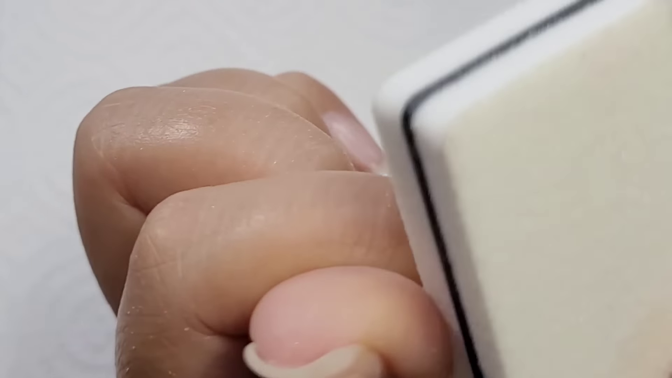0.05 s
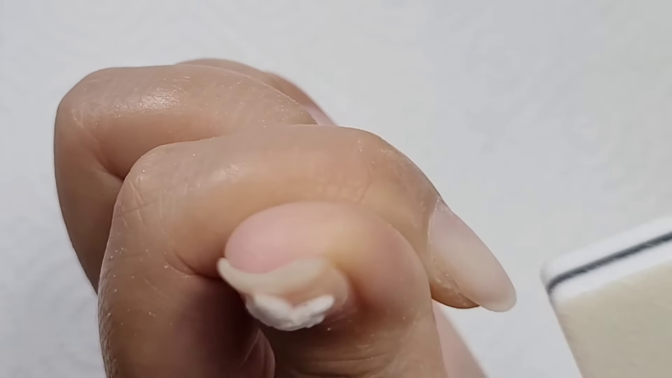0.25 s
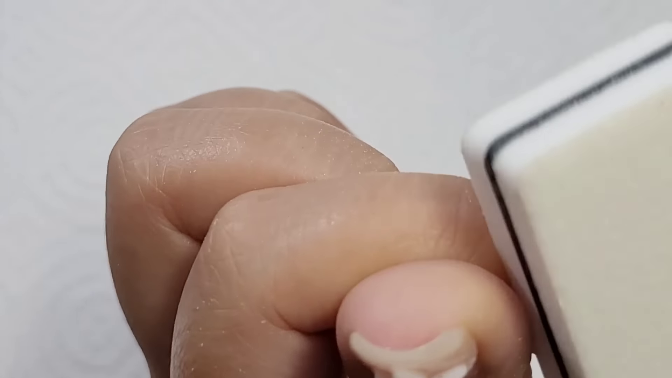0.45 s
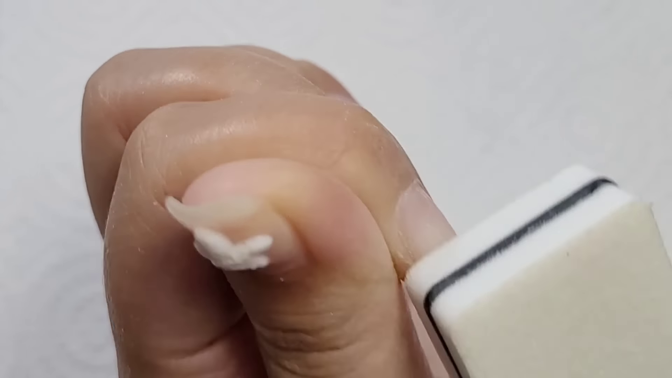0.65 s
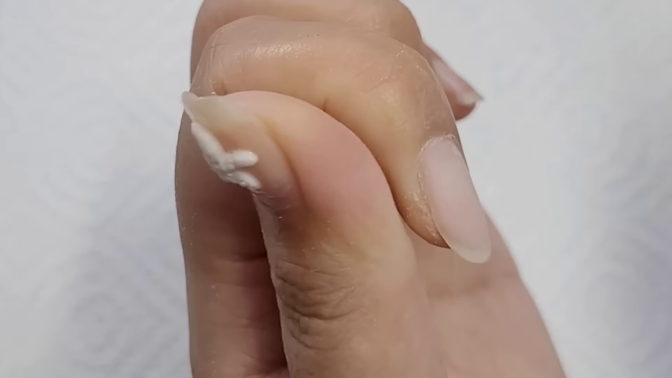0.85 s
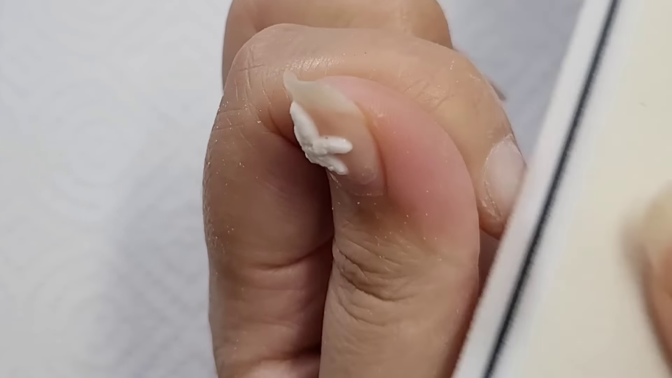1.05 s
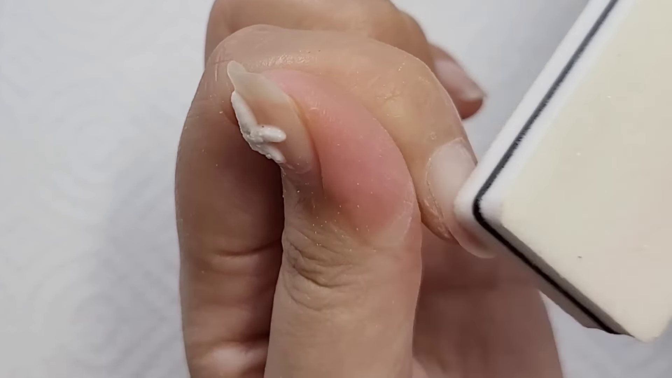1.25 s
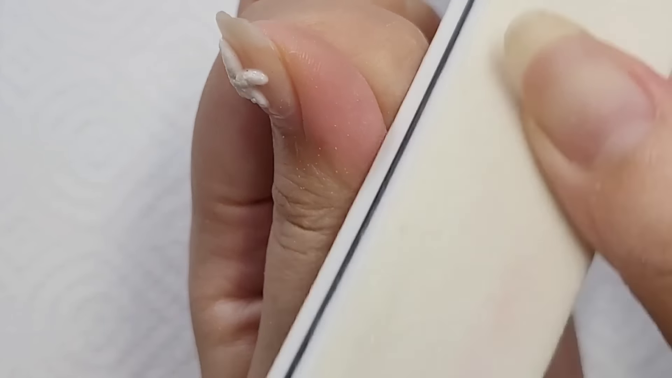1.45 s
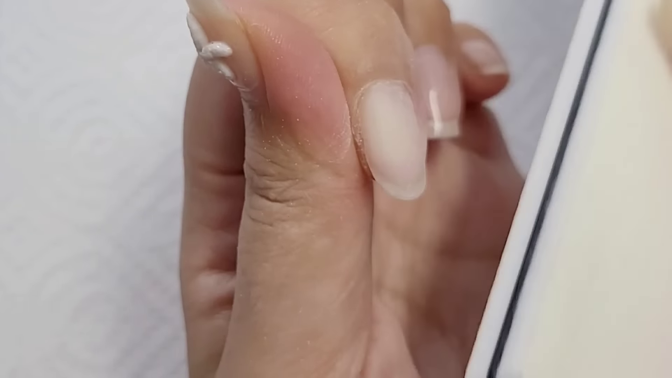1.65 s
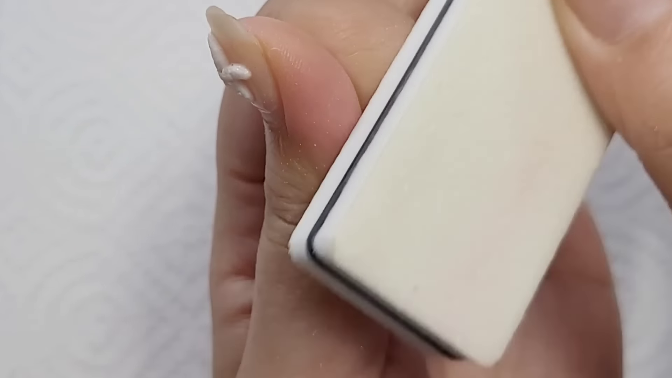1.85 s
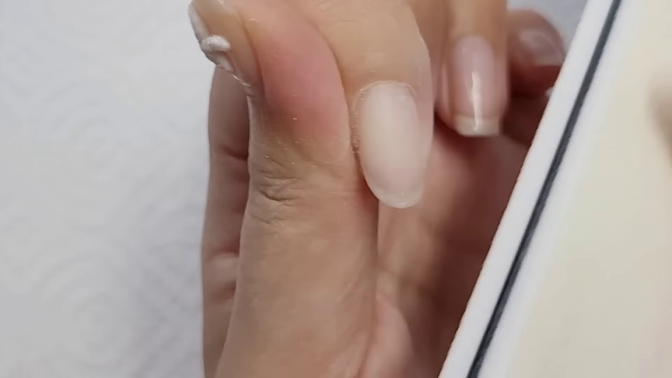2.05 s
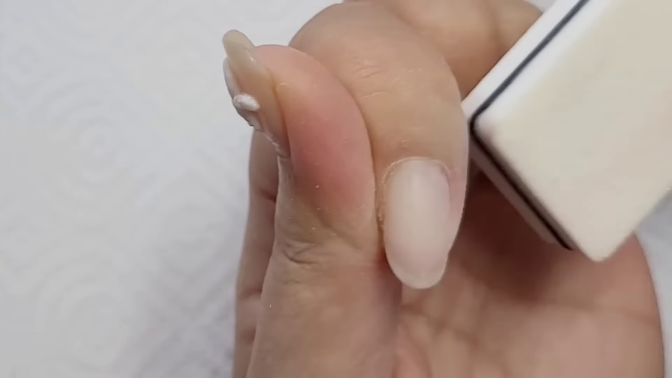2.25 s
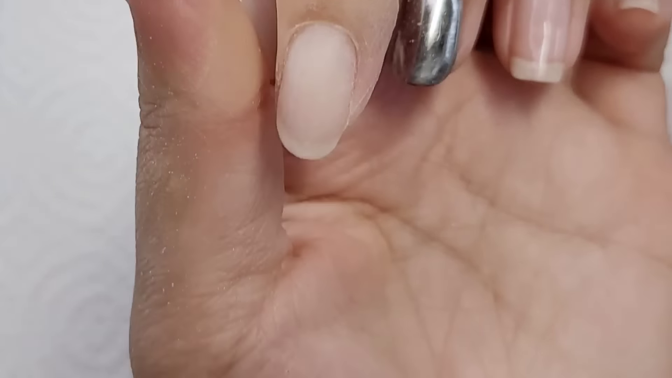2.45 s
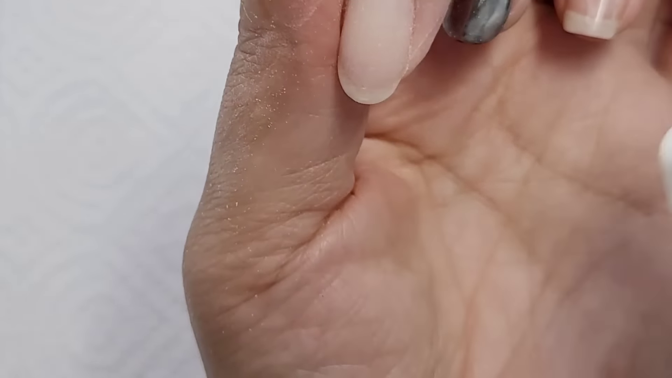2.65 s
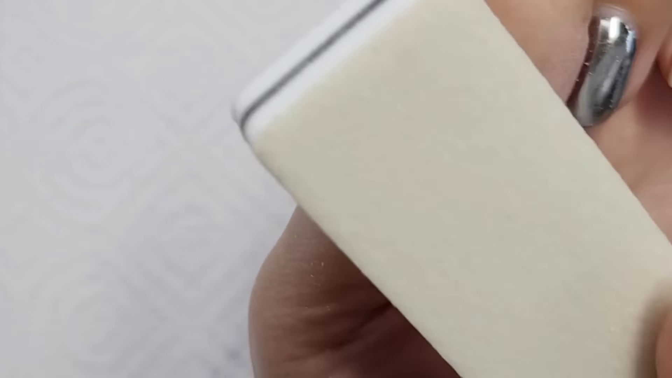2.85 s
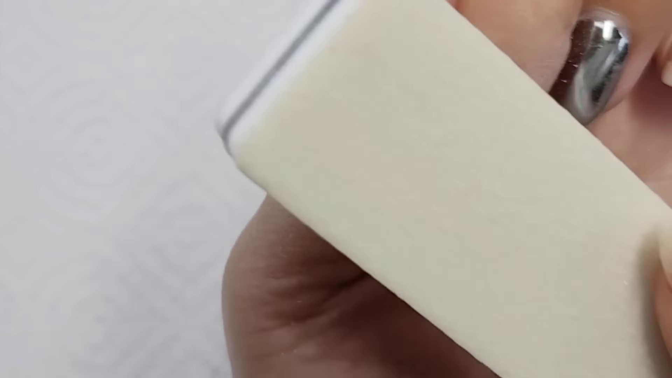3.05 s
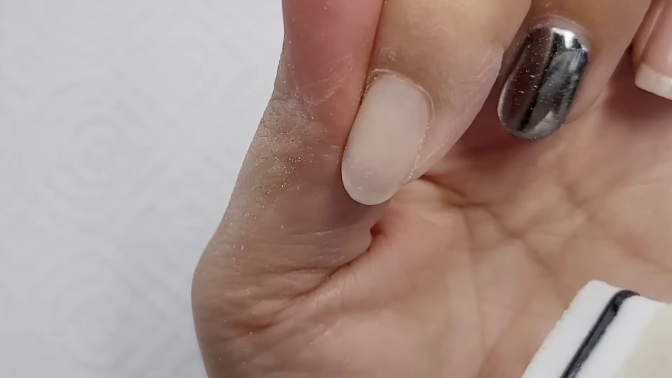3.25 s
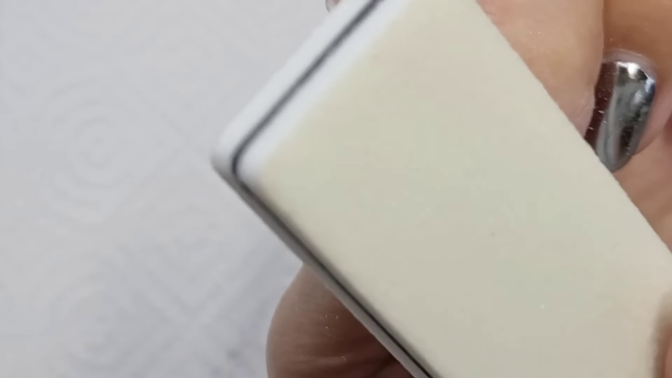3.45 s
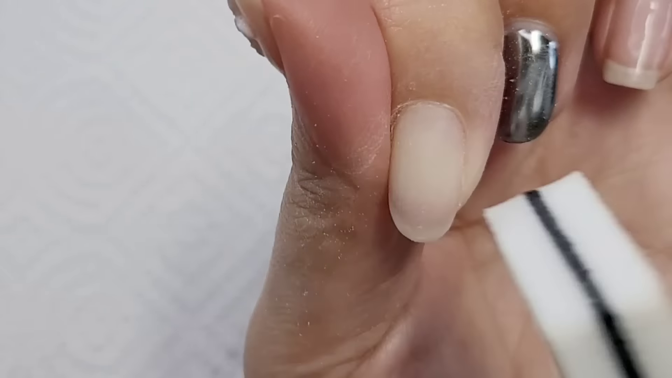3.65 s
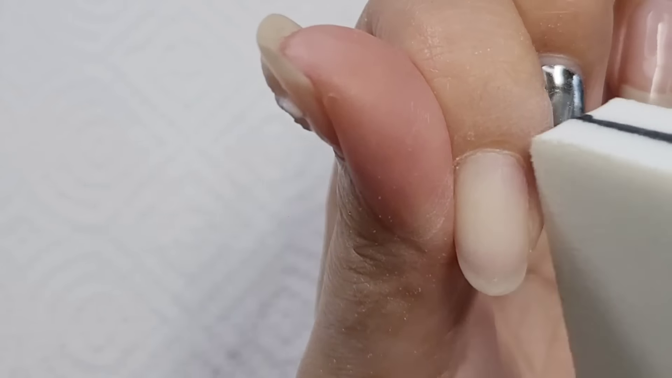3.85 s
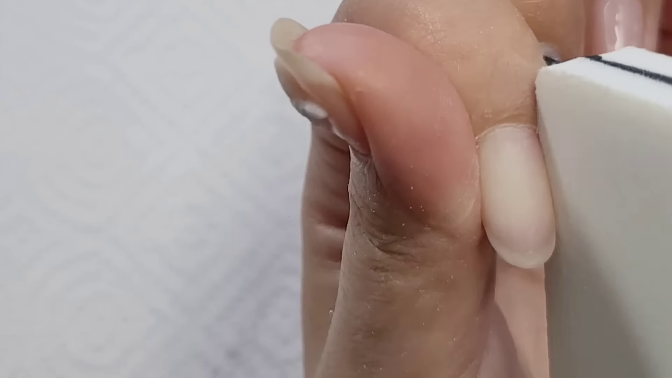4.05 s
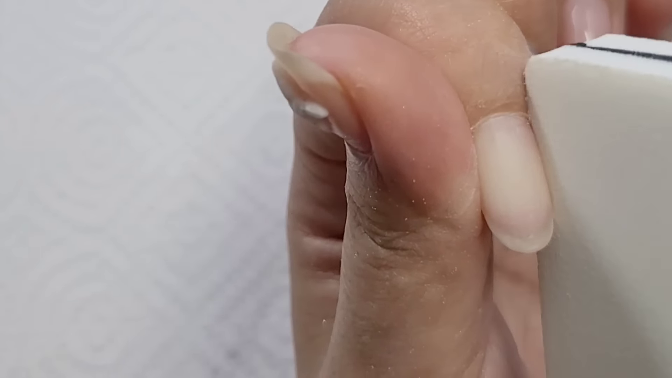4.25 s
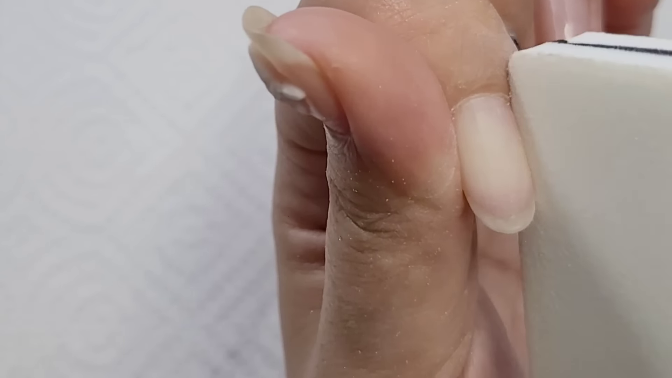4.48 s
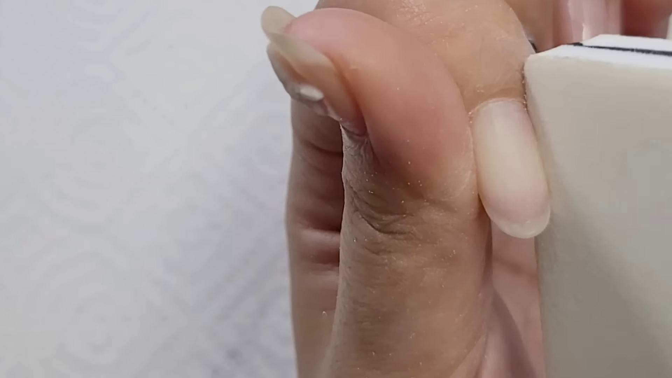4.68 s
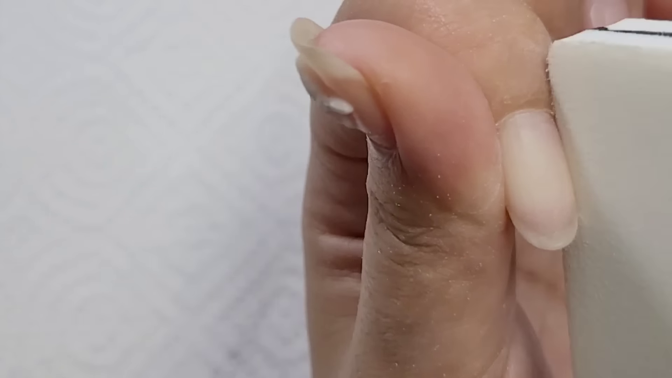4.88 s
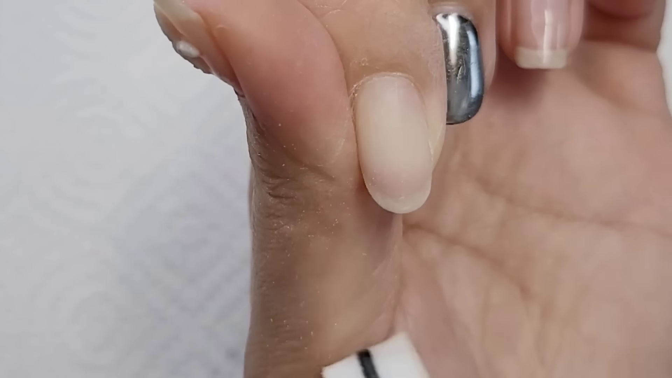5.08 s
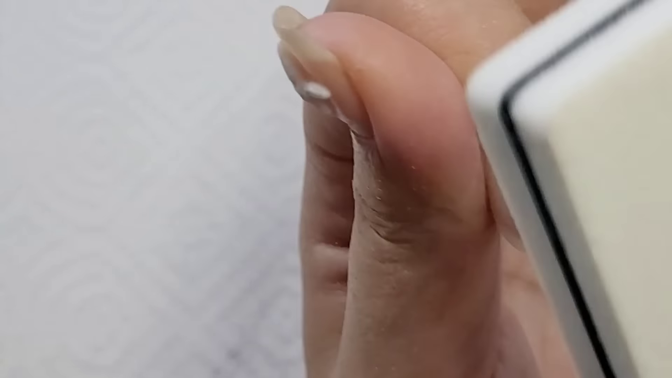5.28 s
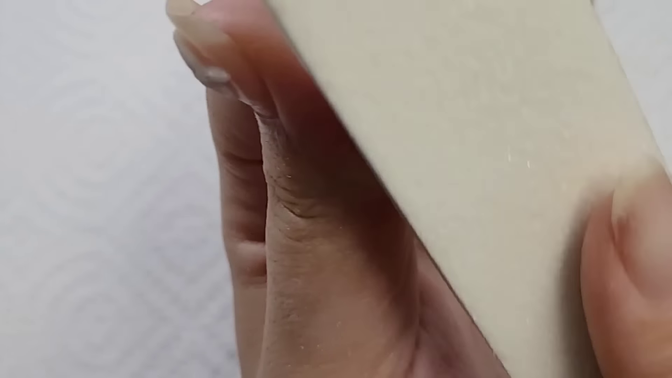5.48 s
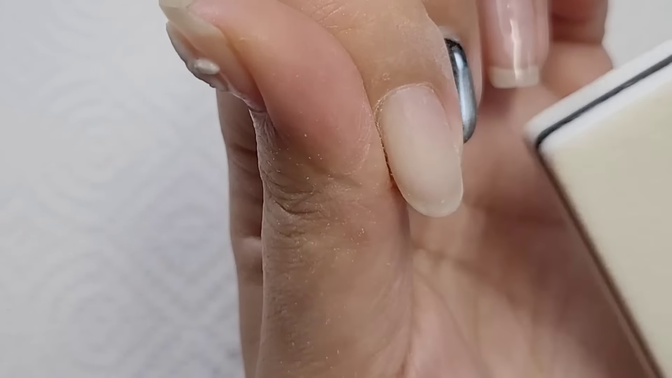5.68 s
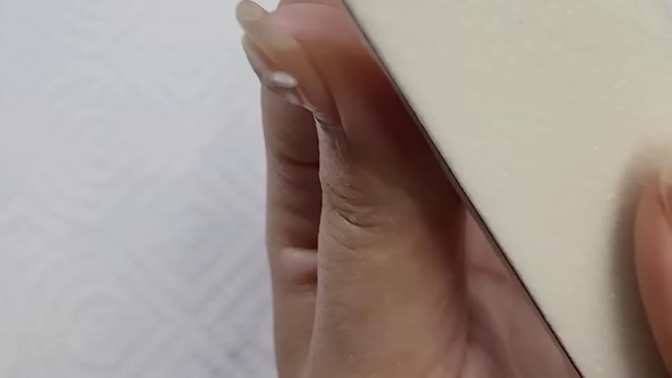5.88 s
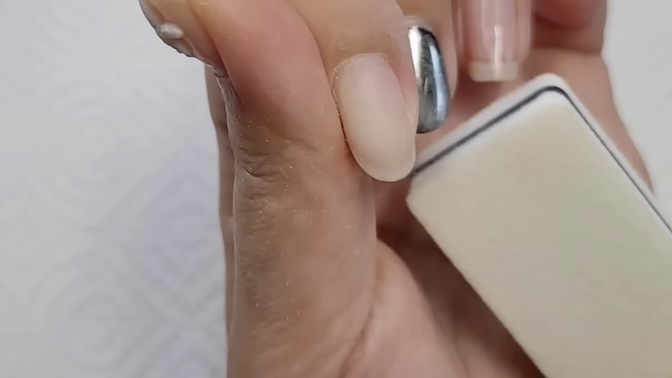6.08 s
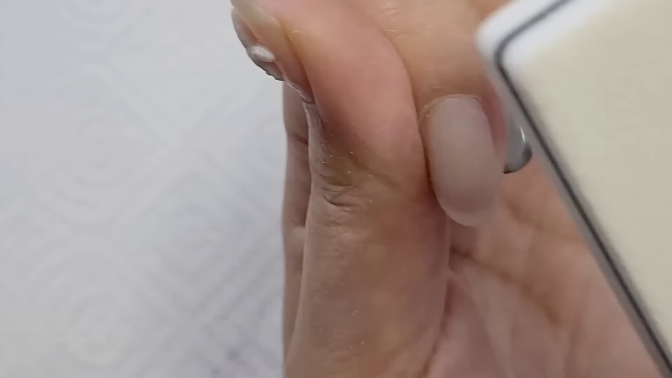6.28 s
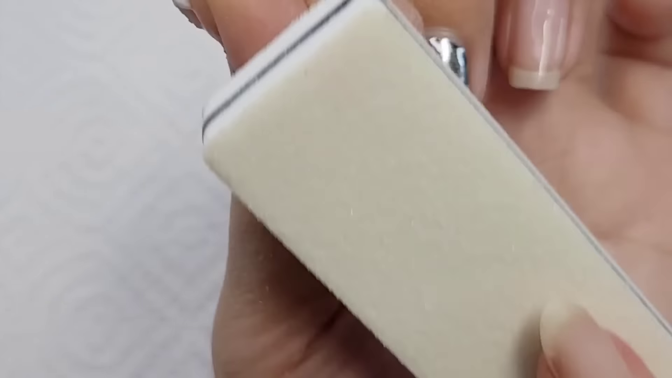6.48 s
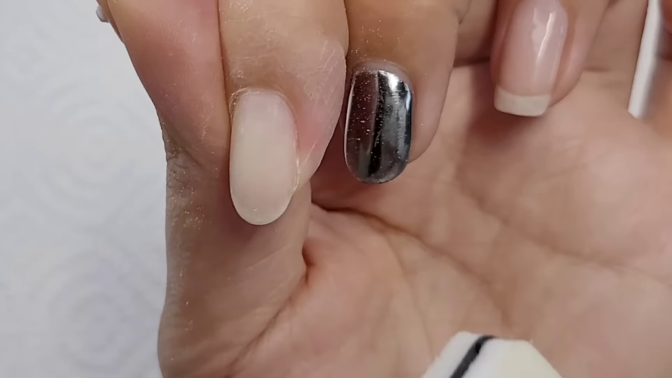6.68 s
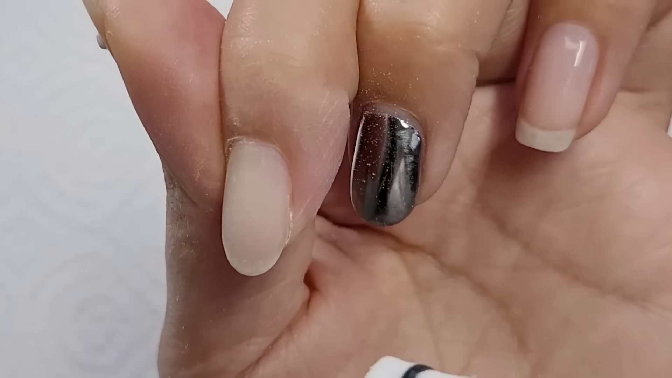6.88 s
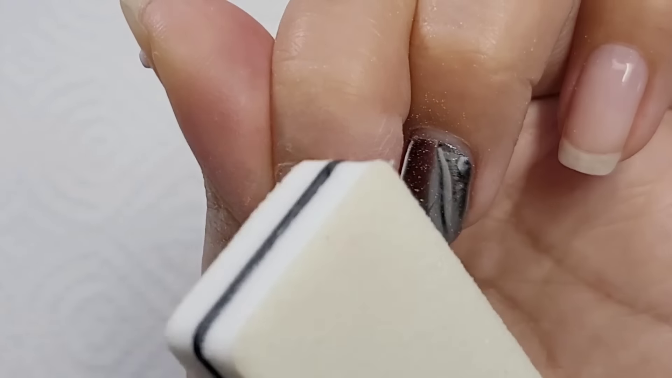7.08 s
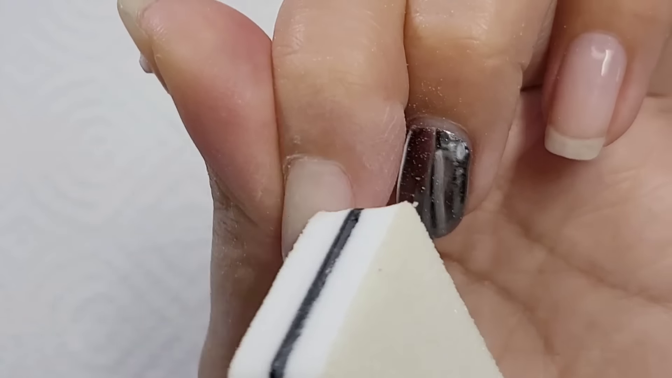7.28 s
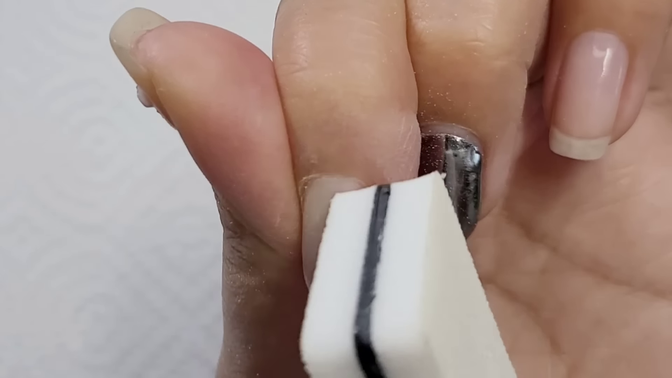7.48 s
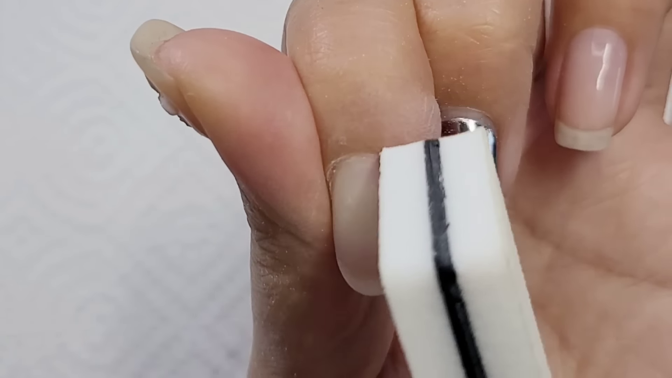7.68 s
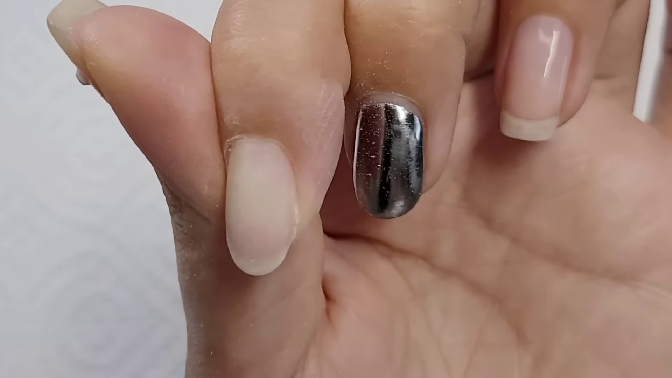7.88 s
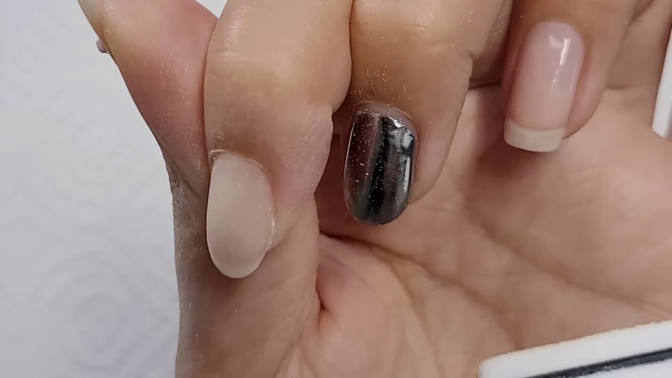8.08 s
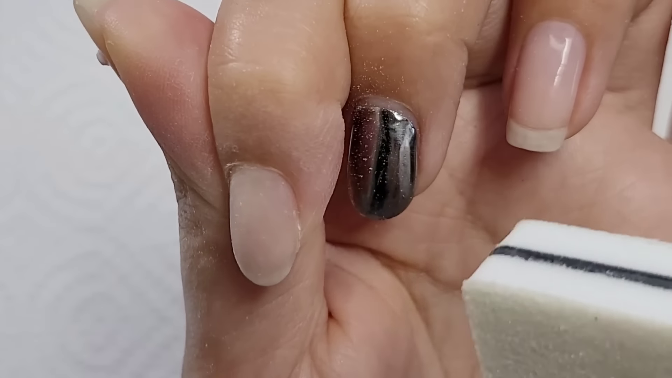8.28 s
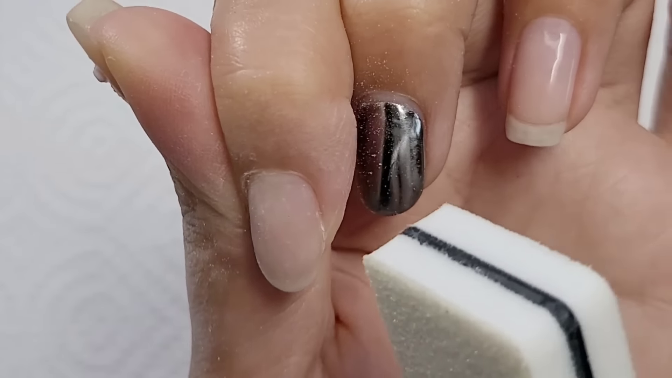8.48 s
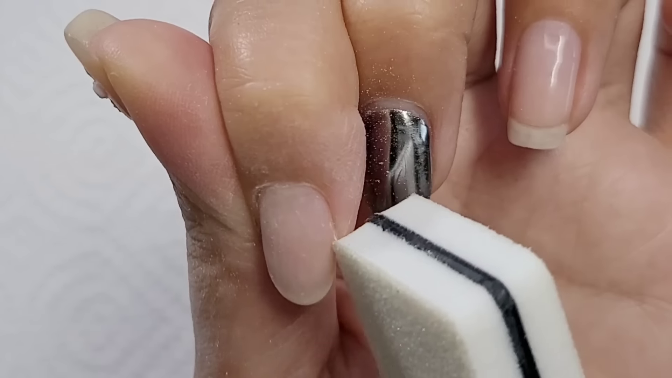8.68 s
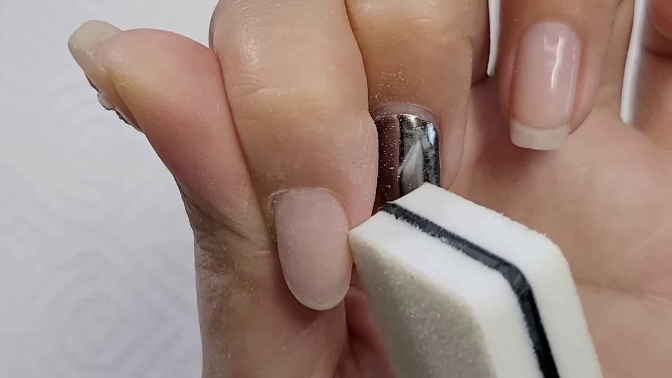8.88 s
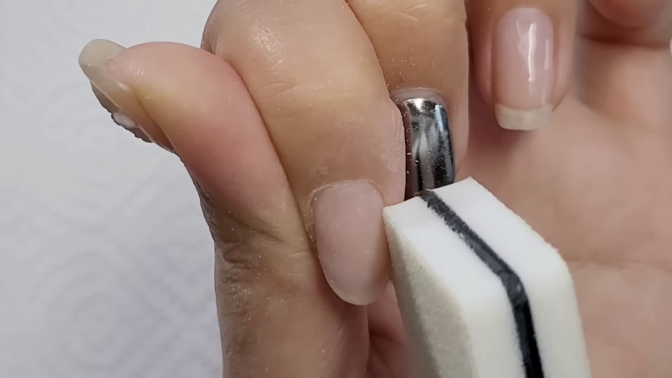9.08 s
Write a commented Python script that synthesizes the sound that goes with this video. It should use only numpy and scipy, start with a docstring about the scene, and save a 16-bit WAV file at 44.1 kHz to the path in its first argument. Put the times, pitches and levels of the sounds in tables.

```python
"""Small quiet room, a phone's stereo microphones close to a fingernail being rubbed with a padded block.
The block lands with a scuff; grit catches and hisses in single strokes, and some hard ones end in a
snap off the nail's edge and a soft finger thud. At 4.2 s comes a quick, even run, then four hard strokes
with snaps, a second run at 7.4 s and a last snap. By 8.6 s the hands rest, leaving low room tone.
Hand and table reflect the sound to the microphones differently on every stroke."""
import sys
import numpy as np
from scipy import signal
from scipy.fft import rfft, irfft, next_fast_len
from scipy.io import wavfile
from scipy.ndimage import map_coordinates

SR = 44100
rng = np.random.default_rng(int(sys.argv[2]) if len(sys.argv) > 2 else 0)


def transcribe(signal):
    """Save signal, clipped to [-1, 1], as a 16-bit WAV file at the path in sys.argv[1]."""
    frames = np.atleast_2d(signal).T
    limited = np.clip(frames, -1, 1)
    pcm = np.round(limited * 32767).astype(np.int16)
    wavfile.write(sys.argv[1], SR, pcm)


N = 402633
TIME = np.arange(N) / SR

# single strokes: t/s, length/s, level/dB, speeding up/s, pressure change along it/dB, body/dB, rasp/dB
SINGLE_STROKES = [(0.0, 0.15, -58, 0.066, -5, 8.5, 10.5), (0.143, 0.21, -39, 0.067, 11.5, -2, 3),
                  (0.527, 0.13, -44, 0.017, -5.5, -0.5, 4), (0.673, 0.17, -39.5, .029, 11.5, -3.5, -0.5),
                  (1.22, 0.21, -39.5, 0.11, -6, -2.5, -2.5), (1.52, 0.22, -43.5, 0.048, 9, -2.5, -2),
                  (1.894, 0.23, -42.5, 0.064, 6.5, 1, 0.5), (2.254, 0.17, -41, .008, 8, 0, 0),
                  (2.685, 0.093, -47, .01, 14, 4, 3), (2.817, 0.07, -60.5, 0.024, -9, 0, -3),
                  (2.917, 0.075, -60.5, .025, 1, 5, 0), (2.959, 0.16, -43.5, 0.0079, -1.5, 0, 1.5),
                  (3.137, 0.16, -39.5, 0.051, 0.5, 2.5, 1.5), (3.291, 0.046, -40.5, 0.027, 2, -4, -2),
                  (3.424, 0.085, -63, 0.037, 7, 1, 7), (3.489, 0.12, -45.5, 0.01, -1.5, -5, 0),
                  (3.654, 0.18, -43.5, 0.097, -19, -3.5, 0), (4.129, 0.075, -67.5, 0.022, 0, 3, 0),
                  (5.073, 0.11, -42, 0.047, 13, 2.5, 2.5), (5.56, 0.25, -39.5, 0.097, -1, 0.5, 0.5),
                  (6.058, 0.194, -38.5, 0.018, 13.5, 0.5, 0.5), (6.543, 0.192, -39, 0.026, 11.5, 1, 0.5),
                  (7.17, 0.11, -52.5, 0.014, 7.5, -3, 3), (7.824, 0.095, -42, .042, 25, 3, 2),
                  (8.502, 0.18, -69, 0.012, 6, 9, 8)]
# quick to-and-fro runs: from t/s, until t/s, beat/s, first, middle and last level/dB, body/dB, rasp/dB
QUICK_RUNS = [(4.239, 5.02, 0.10395, -52, -54, -47, 6.3, 1.5),
              (7.357, 7.78, 0.1176, -45.5, -47, -58, 1.3, 2.8)]
# slips off the nail's edge: t/s, snap/dB, nail knock/dB, finger thud/dB, thud f/Hz, snap decay/s, run-on/dB
EDGE_SLIPS = [(0.334, -30.5, -44, -44.5, 120, .0017, -64.5), (.8239, -28.5, -42.5, -42.5, 117, 0.0033, -66),
              (2.421, -32.5, -33.5, -36, 209, .0018, -53), (2.757, -42.5, -62, -75, 115, 0.0033, -70),
              (5.163, -25.5, -57, -46, 135, 0.0024, -56), (5.777, -36, -43.5, -49, 115, .0036, -69),
              (6.2227, -26.5, -42, -48.5, 115, .0014, -45), (6.709, -27, -38.5, -45, 124, 0.0026, -48),
              (7.9, -31, -56, -44, 132, 0.0039, -52)]
# the block meets the nail: t/s, scuff level/dB, finger thud level/dB
BLOCK_LANDINGS = [(.094, -46, -72), (.94, -47, -75), (1.207, -39.5, -60), (1.514, -41.5, -58),
                  (2.26, -42.5, -49), (2.961, -50, -55), (3.493, -56, -64), (4.027, -58, -74),
                  (5.247, -49.5, -69), (5.522, -51.5, -50.5), (6.035, -58.5, -42.5), (6.491, -45, -53.5),
                  (7.99, -41, -73), (8.447, -55.5, -80)]
# light drags between strokes, one contour each: t/s, level/dB
DRAG_CONTOURS = [
    [(0.86, -66), (0.888, -65), (0.934, -62), (0.954, -51.5), (0.978, -55.5), (1.006, -46.5), (1.056, -53),
     (1.072, -58.5), (1.2, -57)],
    [(2.45, -49), (2.468, -63), (2.478, -72), (2.504, -51), (2.57, -65), (2.598, -55.5), (2.666, -63.5),
     (2.674, -57), (2.68, -64)],
    [(8.03, -52), (8.076, -68), (8.116, -51), (8.274, -62.5), (8.338, -52), (8.378, -80), (8.406, -55.5),
     (8.46, -62.5), (8.49, -88)],
]
# spectrum of grit on nail: f/Hz, level/dB
GRIT_SPECTRUM = [(300, 8), (800, 13), (1400, -4.5), (2000, -6.5), (2700, -10), (3600, -7), (5000, -3.5),
                 (6300, 0.5), (8300, -3), (10500, -3.5), (13000, 0), (16000, -3)]
# spectrum of the snap off the edge: f/Hz, level/dB
SNAP_SPECTRUM = [(300, -20.5), (1200, -11.5), (2600, -2.5), (4500, -3), (7500, -1.5), (10000, -9.5),
                 (16000, -5)]
# modes of the nail, damped by the finger: f/Hz, level/dB, t60/s
NAIL_RINGS = [(420, -1, .009), (760, 0, .010), (1080, -3, .009), (1600, -9, .007)]
# hollow between block and fingers, set by the grip, open to one side: t/s, f/Hz, Q, left minus right/dB
GRIP_HOLLOW = [(.15, 2640, 3, 0), (.53, 2540, 5, 0), (.7, 2640, 1.6, 0), (2.2, 2870, 1.53, 0),
               (2.95, 2660, 3.2, 1), (4.3, 2550, 5.4, -0.5), (5, 2600, 2.5, -0.5), (5.6, 2710, 3.5, -0.5),
               (6.6, 2700, 2.9, 1), (7.2, 2620, 9.6, 2.5), (7.8, 2470, 3.5, 2.5), (8.1, 2730, 2.2, 0.5)]
# resonance of the left and the right microphone port: f/Hz, width/Hz, level/dB
MIC_PORTS = [(8970, 1760, 6.5), (8100, 1500, 4.5)]
# response of the right microphone, facing away from the hand: f/Hz, level/dB
OFF_AXIS_RESPONSE = [(200, 4), (1000, 3), (4000, -0.5), (6300, -3.5), (8500, 3), (11000, -1), (16000, -3)]
# spectrum of the room's air: f/Hz, level/dB
AIR_SPECTRUM = [(15, -33), (28, -7), (40, -7.5), (60, -8.5), (90, -2.5), (140, -9.5), (240, -10),
                (420, -11), (780, -13), (1100, -22.5), (2000, -31.5), (4000, -35), (8000, -40.5),
                (15500, -40.5)]


def rub(start, force, body_db, rasp_db, ring_hz=8250, ring_width_hz=1300, ring_gain_db=35):
    """Grit catches on the nail as the block judders; body lifts about 2 kHz, rasp about 4 kHz."""
    size, strength = len(force), np.sqrt(np.mean(force ** 2))
    grip_s, *grip_columns = np.transpose(GRIP_HOLLOW)
    hollow_hz, q, left_db = (np.interp(start, grip_s, column) for column in grip_columns)
    judder = undb(0.72 * tremor(size, rate_hz=69) + 1.15 * tremor(size, rate_hz=600))
    both, left, right = (hollow(grains(size, per_s=24000, spread_db=1.7), hollow_hz, q) for _ in range(3))
    # the block hides part of the contact patch from each microphone
    grit = colour(both + 0.56 * np.array([left, right]), GRIT_SPECTRUM)
    # a firmer rub has more fine hiss, neutral at -47.5 dB
    hiss_db = max(0.24 * (20 * np.log10(strength) + 47.5), -3.5)
    # the angle of the block sets the brightness, with a notch inside the body
    brightness = [(1200, 0), (1800, body_db + 1.5), (2150, body_db - 4), (2600, body_db),
                  (3350, rasp_db - max(body_db, 0)), (4500, rasp_db), (8400, 0), (13000, hiss_db)]
    grit = unit(colour(grit, brightness))
    # the harder the block bears down, the more of the hiss gathers in the ring of the nail
    ring = undb(ring_gain_db) * force * resonance(grit, ring_hz * rng.uniform(1.0, 1.05), ring_width_hz)
    friction = unit((grit + ring) * force * judder) * strength
    balance = undb(left_db * np.array([[.5], [-.5]]))
    return near_paths(friction) * balance


def stroke_force(length, rise_s, fall_s, db, press_db):
    """One stroke speeds up and slows, while its pressure changes by press_db along the way."""
    t = TIME[:int(length * SR)]
    speeding = np.sin(np.pi / 2 * np.clip(t / rise_s, 0, 1))
    slowing = np.sin(np.pi / 2 * np.clip((length - t) / fall_s, 0, 1))
    return speeding * slowing * undb(db + press_db * (t / length - .5))


def grains(size, per_s, spread_db):
    """Clicks of single grit grains: many small ones, a few large."""
    caught = rng.random(size) < per_s / SR
    clicks = caught * rng.standard_normal(size)
    return unit(clicks * undb(spread_db * np.minimum(rng.exponential(size=size), 4)))


def hollow(x, centre_hz, q):
    """The cavity under the fingers rings at its resonance and radiates very little below it."""
    s = 1j * np.fft.rfftfreq(len(x), 1 / SR) / centre_hz
    ring = s ** 2 / (1 + s / q + s ** 2)
    radiation = s ** 2 / (1 / 2 + s + s ** 2)
    return irfft(rfft(x) * ring * radiation, len(x))


def single_strokes(fall_s=0.045):
    """The block crosses the nail close to the microphones, one stroke at a time."""
    out = np.zeros((2, N))
    for start, length, db, rise_s, press_db, body_db, rasp_db in SINGLE_STROKES:
        force = stroke_force(length, rise_s, fall_s, db, press_db)
        add(out, start, rub(start, force, body_db, rasp_db))
    return out


def quick_runs(moving_share=0.7, rise_share=0.45, press_db=2.0, return_db=-1):
    """Short strokes to and fro on a steady beat, lighter on the way back."""
    out = np.zeros((2, N))
    for first, until, beat, *contour_db, body_db, rasp_db in QUICK_RUNS:
        starts, length = np.arange(first, until, beat), moving_share * beat
        rise_s, fall_s = rise_share * length, (1 - rise_share) * length
        levels = np.interp(starts, np.linspace(first, starts[-1], 3), contour_db)
        for k, (start, db) in enumerate(zip(starts, levels)):
            force = stroke_force(length, rise_s, fall_s, db + return_db * (k % 2 - .5), press_db)
            add(out, start, rub(start, force, body_db, rasp_db))
    return out


def edge_slips(onset_s=.0014, lead_s=.006, rebound_s=0.0076, rebound_db=-9.5):
    """The block lets go in a burst of grains and catches once more; nail knocks, fingertip thuds."""
    out = np.zeros((2, N))
    t = TIME[:SR // 12] - lead_s
    after = np.maximum(t, 0)
    for start, snap_db, knock_db, thud_db, thud_hz, decay_s, run_on_db in EDGE_SLIPS:
        burst = np.exp(np.minimum(t, 0) / onset_s - after / decay_s)
        for delay, gain in ((0, 1), (rebound_s, undb(rebound_db))):
            snap = unit(colour(grains(len(t), per_s=15000, spread_db=5.0), SNAP_SPECTRUM)) * burst
            knock = nail_knock(after)
            add(out, start + delay - lead_s, near_paths(gain * undb(snap_db) * snap))
            add(out, start + delay - lead_s, gain * undb(knock_db) * knock)
        add(out, start - lead_s, undb(thud_db) * finger_thud(t, thud_hz))
        # the block runs on over the fingertip, easing off
        run_on = stroke_force(length=0.085, rise_s=0.007, fall_s=.04, db=run_on_db, press_db=-5)
        add(out, start, rub(start, run_on, body_db=-4, rasp_db=2))
    return out


def nail_knock(t):
    """The nail rings briefly; neighbouring modes swing opposite ways at its tip."""
    knock = np.zeros(len(t))
    for k, (hz, db, t60) in enumerate(NAIL_RINGS):
        mode = np.sin(2 * np.pi * hz * rng.uniform(1.0, 1.05) * t)
        knock += (-1) ** k * undb(db) * mode * np.exp(-np.log(1000) * t / t60)
    return knock


def finger_thud(t, hz, decay_cycles=0.67, lag_s=0.0025):
    """The fingertip swings back just after a push and is still within a few cycles."""
    cycles = hz * np.maximum(t - lag_s, 0)
    return np.sin(2 * np.pi * cycles) * np.exp(-cycles / decay_cycles)


def landings(rise_s=0.0057, decay_s=0.016):
    """The block meets the nail: a sudden scuff that dies away, and a soft thud."""
    out = np.zeros((2, N))
    t = TIME[:SR // 12]
    scuff = np.minimum(t / rise_s, 1) * np.exp(-np.maximum(t - rise_s, 0) / decay_s)
    for start, scuff_db, thud_db in BLOCK_LANDINGS:
        add(out, start, rub(start, undb(scuff_db) * scuff, body_db=-1, rasp_db=-1))
        add(out, start, undb(thud_db) * finger_thud(t, hz=110))
    return out


def drags(edge_s=0.0067):
    """Between strokes the block stays on the nail and whispers over it."""
    out = np.zeros((2, N))
    for contour in DRAG_CONTOURS:
        times, levels = np.transpose(contour)
        start = times[0]
        force = stroke_force(times[-1] - start, edge_s, edge_s, db=2, press_db=0)
        force *= undb(np.interp(start + TIME[:len(force)], times, levels))
        add(out, start, rub(start, force, body_db=1, rasp_db=2))
    return out


def squeak(start=3.076, length=0.011, hz=1080, db=-54):
    """One tiny soft squeak partway through a stroke."""
    out = np.zeros((2, N))
    t = TIME[:int(length * SR)]
    add(out, start, undb(db) * np.sin(np.pi * t / length) ** 2 * np.sin(2 * np.pi * hz * t))
    return out


def skin_rustle(db=-79, still_s=8.62, fade_s=0.054):
    """Fingers shift faintly against each other until the hands come to rest."""
    friction = [colour(grains(N, per_s=4200, spread_db=1), GRIT_SPECTRUM) for _ in range(2)]
    rustle = np.array([unit(hollow(side, centre_hz=2600, q=7.9)) for side in friction])
    moving = np.clip((still_s - TIME) / fade_s, 0, 1)
    return rustle * undb(db + 4 * tremor(N, rate_hz=18)) * moving


def near_paths(x, count=5, bounce_gain=.32, reach_s=.003, drift_s_per_s=.0006, right_lag_s=.0003):
    """Direct sound and close bounces off hand and table, their paths drifting as the hands move."""
    x = np.pad(x * np.ones((2, 1)), ((0, 0), (0, SR // 100)))
    t = TIME[:x.shape[1]]
    channels = []
    for side, lag in zip(x, (0, right_lag_s * rng.random())):  # the left microphone is the nearer one
        delayed = lambda delay: map_coordinates(side, [(t - lag - delay) * SR], order=3)
        delays = reach_s * (np.arange(count) + rng.random(count) + 1 / 2) / count
        bounces = sum(rng.choice([-1, 1]) * delayed(delay + drift_s_per_s * rng.standard_normal() * t)
                      for delay in delays)
        channels.append(delayed(0) + bounce_gain * bounces)
    return np.array(channels) / np.sqrt(1 + count * bounce_gain ** 2)


def room(x, t60=0.25, wet_db=-12.5, first_echo_s=0.0041):
    """The walls of the small room return a short diffuse tail, unrelated left and right."""
    t = TIME[:SR // 2]
    tail = rng.standard_normal((2, len(t))) * np.exp(-np.log(1000) * t / t60) * (t > first_echo_s)
    tail /= np.sqrt(np.sum(tail ** 2) / 2)
    tail = colour(tail, [(300, 0.5), (4000, 2.5), (9000, -1.0), (15000, -1)])
    return x + undb(wet_db) * signal.fftconvolve(x, tail, axes=1)[:, :N]


def microphones(x):
    """Each microphone port rings in the treble; the right one faces away from the hand."""
    hz = np.fft.rfftfreq(N, 1 / SR)
    ring = np.array([undb(db / (1 + (2 * (hz - centre) / width) ** 2)) for centre, width, db in MIC_PORTS])
    left, right = irfft(rfft(x) * ring, N)
    return np.array([left, colour(right, OFF_AXIS_RESPONSE)])


def room_tone(db=-66.5, left_lag_s=0.00048):
    """Low steady air noise reaches the microphones from the right, along with a diffuse share."""
    direct, left, right = colour(rng.standard_normal((3, N)), AIR_SPECTRUM)
    diffuse = colour(np.array([left, right]), [(50, -3), (300, -3), (900, -3), (2000, 2)])
    air = np.array([np.roll(direct, int(left_lag_s * SR)), direct]) + diffuse
    return unit(air) * undb(db + 0.38 * tremor(N, rate_hz=4.1))


def tremor(size, rate_hz):
    """Smooth random unevenness with a spread near 1."""
    knots = rng.standard_normal(int(size * rate_hz / SR) + 2)
    return np.interp(np.arange(size) * rate_hz / SR, np.arange(len(knots)), knots)


def resonance(x, centre_hz, width_hz):
    """Two-pole band-pass, gain 1 at the centre."""
    return signal.lfilter(*signal.iirpeak(centre_hz, centre_hz / width_hz, fs=SR), x)


def colour(x, points):
    """Filter by a spectrum of points: f/Hz, level/dB."""
    size = next_fast_len(x.shape[-1])
    hz, db = np.transpose(points)
    gain = undb(np.interp(np.log(np.fft.rfftfreq(size, 1 / SR) + 1), np.log(hz), db))
    return irfft(rfft(x, size) * gain, size)[..., :x.shape[-1]]


def undb(db):
    """Decibels to gain."""
    return 10 ** (np.asarray(db) / 20)


def unit(x):
    """Scale to an rms of 1."""
    return x / np.sqrt(np.mean(x ** 2))


def add(out, start, x):
    """Mix a sound in at a time in seconds."""
    i = max(int(start * SR), 0)
    out[:, i:i + x.shape[-1]] += x[..., :max(N - i, 0)]


def scene():
    """Hands close to the microphones, the small room and its quiet air behind."""
    hands = single_strokes() + quick_runs() + drags() + landings() + edge_slips() + squeak() + skin_rustle()
    return microphones(room(hands)) + room_tone()


def record(dry, top_hz=15800):
    """The phone cuts the top treble steeply."""
    return signal.sosfiltfilt(signal.ellip(10, .1, 60, top_hz, fs=SR, output="sos"), dry)


dry = scene()
out = record(dry)
transcribe(out)
```